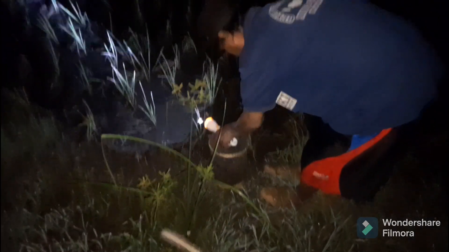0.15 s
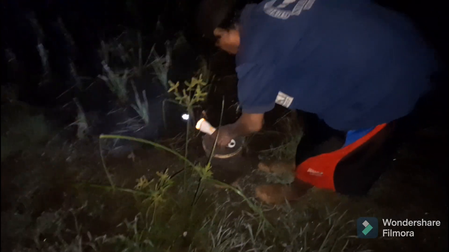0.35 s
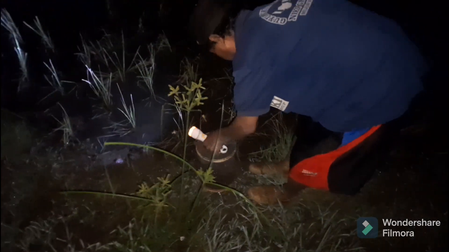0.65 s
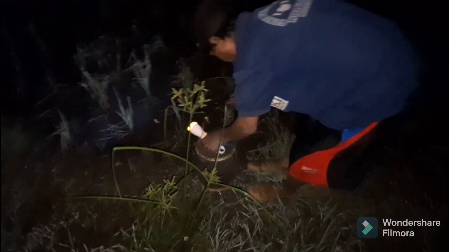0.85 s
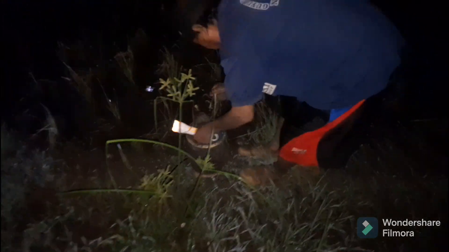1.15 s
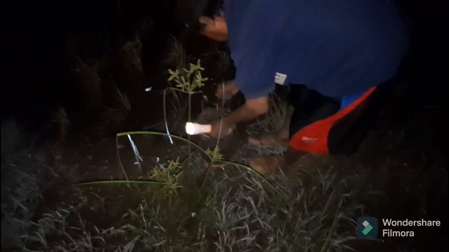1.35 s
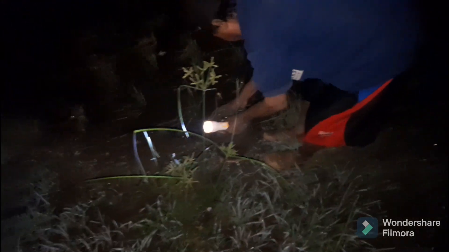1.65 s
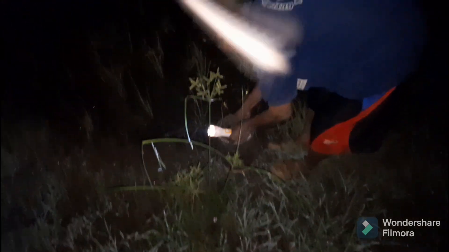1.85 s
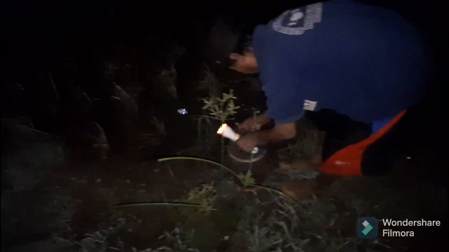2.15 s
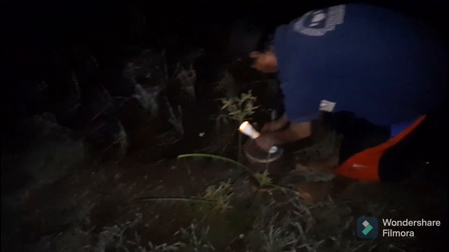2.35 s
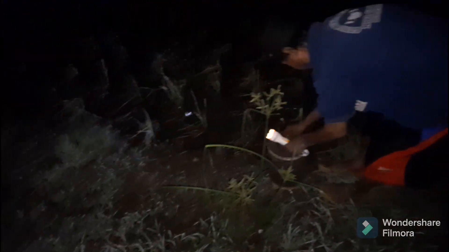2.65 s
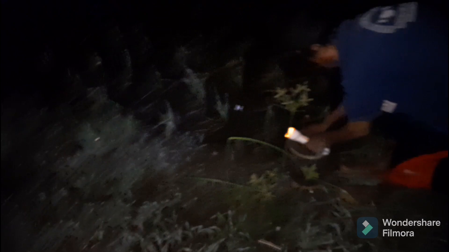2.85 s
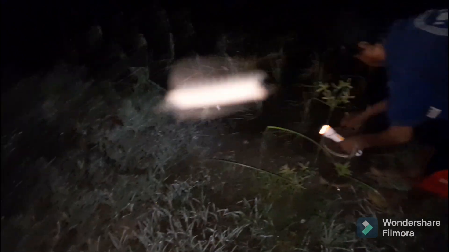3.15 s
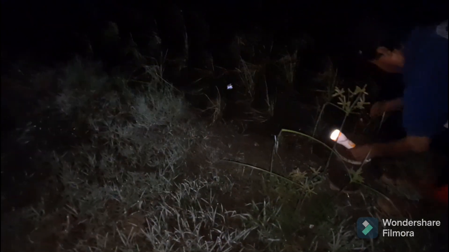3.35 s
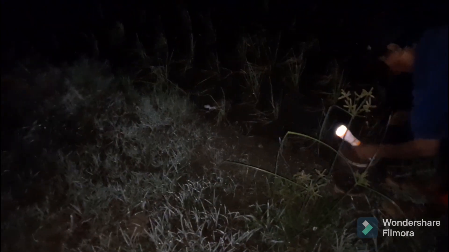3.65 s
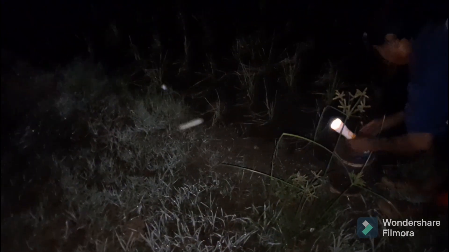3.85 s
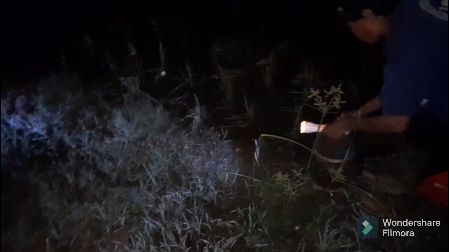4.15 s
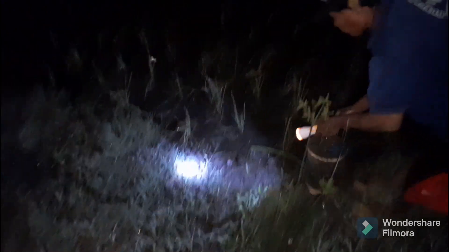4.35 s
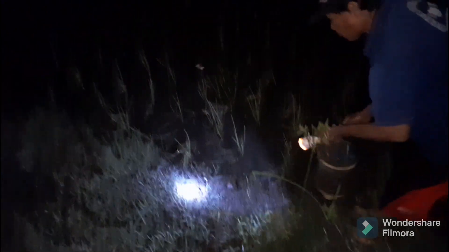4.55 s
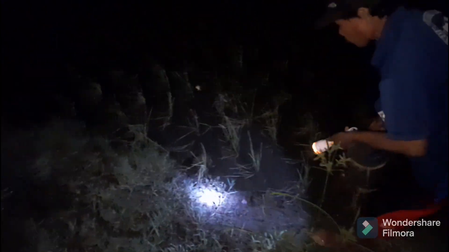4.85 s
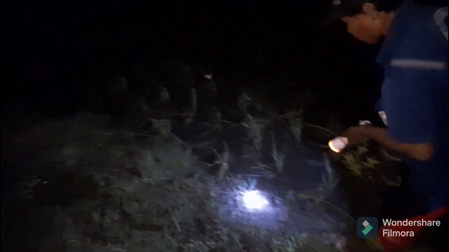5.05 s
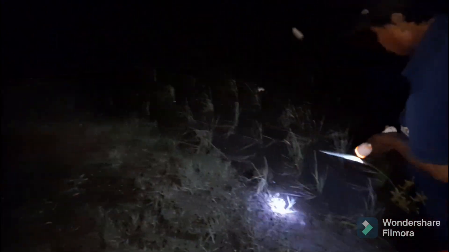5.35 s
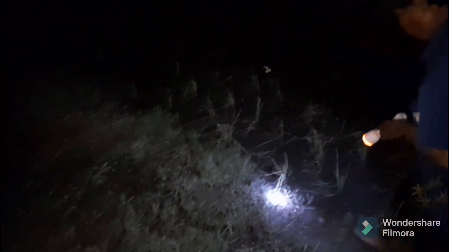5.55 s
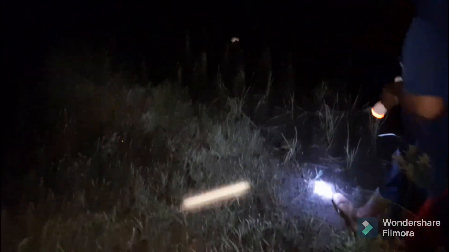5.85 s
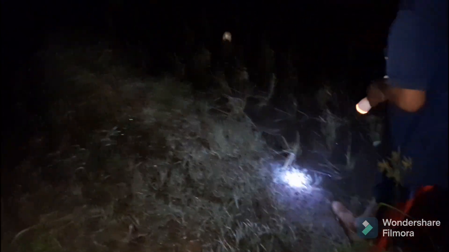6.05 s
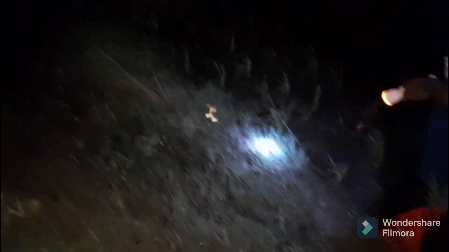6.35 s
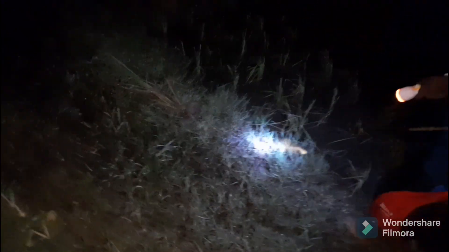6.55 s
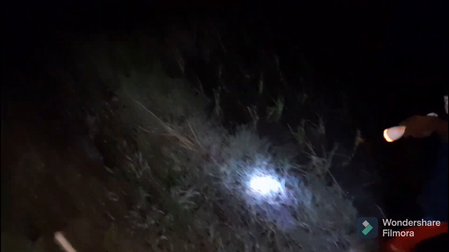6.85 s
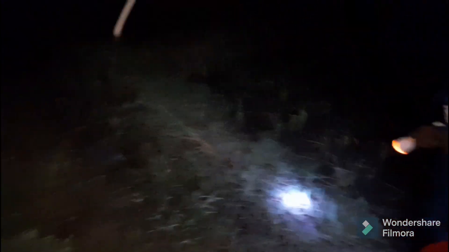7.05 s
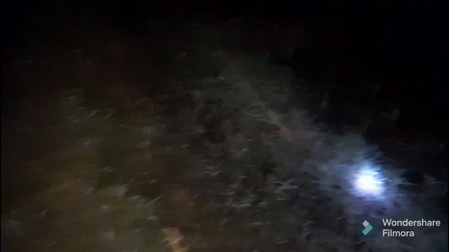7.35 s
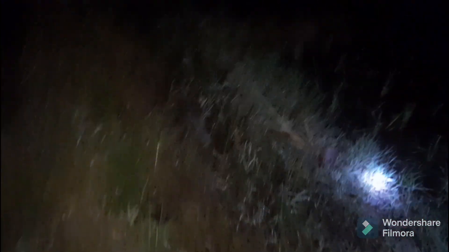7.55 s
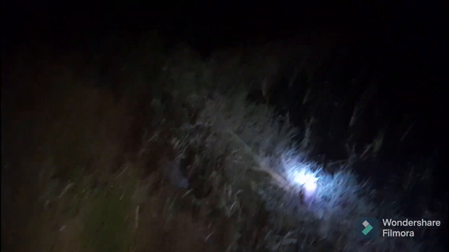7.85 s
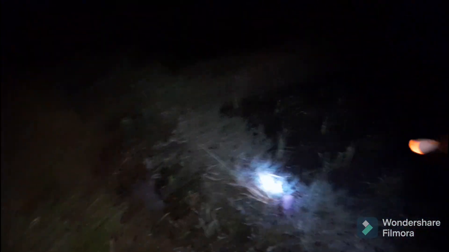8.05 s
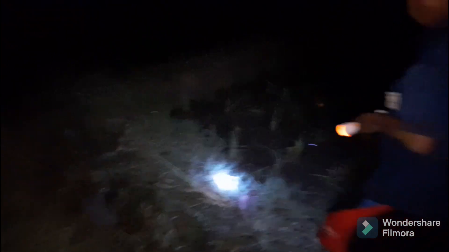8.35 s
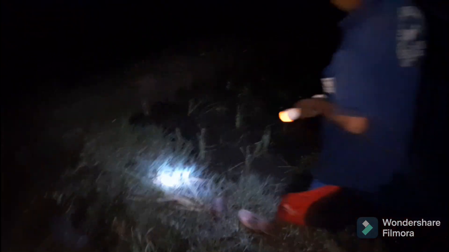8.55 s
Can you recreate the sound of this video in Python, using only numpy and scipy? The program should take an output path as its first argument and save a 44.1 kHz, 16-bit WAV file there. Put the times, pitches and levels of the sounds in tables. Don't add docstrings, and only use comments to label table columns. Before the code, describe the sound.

A summer night on a river bank, hand-held stereo with the view slowly turning. Throughout, deep soft river rumble lies under a close mole cricket's continuous reedy trill, first left, weaker around 4 s, stronger and centred near 6.5 s. Clear cricket chirps come about twice a second until 5.3 s, faintly returning near 7.5 s, amid very high rasping buzzers and quick chirpers; a faint far motor hum fades early. From 0 to 0.6 s grass swishes with dry ticks. Between 0.73 and 1.05 s heavy thuds, gritty crunches and two hollow pot knocks form the loudest moment. Light rustles and snaps follow at 2.3-2.7 s, a tiny mud suck at 3.4 s. Higher chirps sound at 5, 5.5 and 5.9 s. At 6.1-6.7 s the pot is touched and set down ringing; buzzers drop at 6.3 s. Soft bumps at 7.3-7.8 s, a light step at 8.1 s and grass swishing finish.

```python
import sys
import numpy as np
from scipy import signal
from scipy.fft import rfft, irfft, next_fast_len
from scipy.io import wavfile
from scipy.ndimage import uniform_filter1d

SR = 44100
rng = np.random.default_rng(int(sys.argv[2]) if len(sys.argv) > 2 else 0)


def generate_wav(sig):
    pcm = np.round(np.clip(np.atleast_2d(sig).T, -1, 1) * 32767).astype(np.int16)
    wavfile.write(sys.argv[1], SR, pcm)


def linear_from_db(decibels):
    return 10 ** (np.asarray(decibels, float) / 20)


N = 384111
T = np.arange(N) / SR


def level(x):
    return x / np.sqrt(np.mean(x ** 2))


def columns(table):
    s, *rest = np.transpose(table)
    return [np.interp(T, s, c) for c in rest]


def panned(pan_db):
    return linear_from_db(np.array([pan_db + 0 * T, -pan_db + 0 * T]) / 2)


def coloured(x, points):
    hz, db = np.transpose(points)
    size = next_fast_len(N)
    f = np.arange(size // 2 + 1) * SR / size + 1
    gain = linear_from_db(np.interp(np.log(f), np.log(hz), db))
    return level(irfft(rfft(x, size) * gain, size)[..., :N])


def band(x, hz, width_hz, order=2):
    edges = [max(hz - width_hz / 2, 20), min(hz + width_hz / 2, .45 * SR)]
    return level(signal.sosfilt(signal.butter(order, edges, "band", fs=SR, output="sos"), x))


def pair(likeness):
    mid, side = rng.standard_normal((2, N))
    c = np.clip(likeness, 0, 1)
    return np.sqrt(1 + c) * mid + np.sqrt(1 - c) * side * np.array([[1], [-1]])


def walk(rate):
    k = int(SR / rate)
    held = np.repeat(rng.standard_normal(900)[:N // k + 1], k)
    return 0.87 * uniform_filter1d(uniform_filter1d(held, k), k)[:N]


def gate(start, length, edge=0.0027):
    return np.clip(np.minimum(T - start, start + length - T) / edge, 0, 1)


def swell(start, hold, rise, fall):
    return np.exp(np.minimum((T - start) / rise, 0) + np.minimum((start + hold - T) / fall, 0))


def add(out, s, sound, pan_db):
    i = int(s * SR)
    gains = linear_from_db(np.array([[pan_db], [-pan_db]]) / 2)
    out[:, i:i + sound.shape[-1]] += (sound * gains)[:, :N - i]


def strokes(hz, rate, duty, wander_hz, slip, uneven_db, blur, lag=0):
    turn = np.cumsum(rate * (1 + 0.0049 * walk(2.9))) / SR
    chance = rng.standard_normal((1500, 2))
    stroke = turn.astype(int)
    part = np.clip((turn - stroke) / duty, 0, 1)
    phase = 2 * np.pi * np.cumsum(hz + wander_hz * walk(20)) / SR
    tone = np.sin(phase + slip * chance[stroke, 0])
    size = linear_from_db(uneven_db * chance[:, 1])[stroke]
    direct = level(np.sin(np.pi * part) ** 2 * size * tone)
    plants = np.exp(-T[:700] / .004) * rng.standard_normal((2, 700))
    echoes = level(signal.oaconvolve(direct[None], plants, axes=1)[:, :N])
    return level(np.array([np.roll(direct, lag), direct]) + blur * echoes)


# frequency in Hz, power density in dB per Hz
AIR_SPECTRUM = [(300, -3), (450, -4.5), (900, -51), (1400, -10.5), (2200, -4), (3300, 15.5), (3900, -62),
                (5000, -12), (7000, -4), (9500, 2), (11200, -2), (12500, -37), (15000, -6), (16500, -41)]
AIR_DB = -61.5


def night_air():
    return coloured(pair(0.25), AIR_SPECTRUM) * linear_from_db(AIR_DB + 1.5 * walk(2.17))


RIVER_PAN_DB, RIVER_TURN_DB, RIVER_TURN_S = 0.9, -0.3, 5.2
MOTOR_DB, MOTOR_FADE_DB_S = -43, 4


def river_side():
    return panned(RIVER_PAN_DB + RIVER_TURN_DB * np.clip(T - RIVER_TURN_S, 0, 1))


def far_motor():
    tone = np.sin(2 * np.pi * np.cumsum(128 + 1.5 * walk(8)) / SR)
    throb = 1 + 1.1 * np.sin(2 * np.pi * 25.6 * (T - .032))
    return level(tone * throb) * linear_from_db(MOTOR_DB - MOTOR_FADE_DB_S * T ** 2 + 1.3 * walk(7.2)) * river_side()


# time in seconds, level in dB
RUMBLE_LEVEL = [(0.0, -46.5), (.4, -47), (.75, -44), (1.2, -48), (1.5, -49.5), (1.75, -48), (2.4, -47.5),
                (3.2, -49), (3.9, -48.5), (4.8, -51.5), (5.7, -49.5), (6.2, -48), (6.9, -50.5),
                (7.15, -52.5), (7.4, -49), (8.3, -49), (8.55, -52), (8.71, -50)]
# frequency in Hz, power density in dB per Hz
RIVER_SPECTRUM = [(20, -45), (31, -27), (42, -14), (60, -2), (123, 0), (150, -1), (173, -8.5), (193, -12),
                  (285, -22.5), (400, -31), (520, -55), (880, -100)]


def river():
    deep_db = columns(RUMBLE_LEVEL)[0]
    return coloured(pair(0.88), RIVER_SPECTRUM) * linear_from_db(deep_db + 1.45 * walk(8.2)) * river_side()


SHAKE_DB, SHAKE_S = -11.5, 0.05


def shaken_bank():
    shake = sum(linear_from_db(row[1] + SHAKE_DB) * swell(row[0], 0.018, 0.024, SHAKE_S) for row in POT_KNOCKS)
    upper_db = columns(RUMBLE_LEVEL)[0] - 20
    return band(pair(0.66), 258, 313) * (linear_from_db(upper_db + 3.6 * walk(11)) + shake) * river_side()


def chirper(hz, rate, late_s):
    turn = 2 * np.pi * rate * (T - late_s)
    beat = np.clip(.7 + 1.4 * np.sin(turn), .2, 1) * linear_from_db(1.5 * walk(9))
    return beat * strokes(hz + 35 * np.cos(turn), 126, duty=.55, wander_hz=45, slip=2.2,
                          uneven_db=2.5, blur=.55, lag=2)


# time in seconds, level of the upper in dB, level of the lower in dB
CHIRPER_LEVELS = [(0, -80, -85), (1.75, -78, -85), (3.2, -68, -83), (4.4, -67.5, -79), (5.3, -69, -71.5),
                  (6.3, -77, -68.5), (7.2, -72, -69), (7.9, -72.5, -70), (8.2, -80, -80), (8.71, -80, -80)]
# time in seconds, level of the lower in dB, level of the higher in dB
BUZZ_LEVELS = [(0, -77, -72), (1.5, -67, -68), (3, -71.5, -68), (4.6, -68.5, -66), (5.2, -67, -67.5),
               (6.3, -70, -73)]
BUZZ_STOP_S, BUZZ_FADE_S, FAR_BUZZ_DB = 6.32, .03, -79
LOW_PAN_DB, HIGH_PAN_DB, CHIRPER_PAN_DB = 9.5, -0.5, 14
CHORUS_HZ, CHORUS_WIDTH_HZ, CHORUS_DB = 9680, 2800, -72


def bush_crickets():
    low = strokes(9620 + 60 * walk(1.5), 100.8, duty=.38, wander_hz=60, slip=2, uneven_db=2, blur=.4, lag=2)
    overtone = strokes(14600, 100.8, duty=.07, wander_hz=300, slip=3, uneven_db=1.5, blur=.7, lag=2)
    low = low + linear_from_db(-12) * overtone
    high = strokes(10380 + 70 * walk(1.5), 131.2, duty=.4, wander_hz=70, slip=2, uneven_db=2, blur=.4, lag=1)
    far = strokes(11000, 138.8, duty=.4, wander_hz=150, slip=3, uneven_db=1.5, blur=.7, lag=1)
    upper_db, lower_db = columns(CHIRPER_LEVELS)
    upper_chirps = chirper(9420 - 55 * T, 7.69, 2.966) * linear_from_db(upper_db)
    lower_chirps = chirper(8370, 8.24, 5.225) * linear_from_db(lower_db)
    chirps = (upper_chirps + lower_chirps) * panned(CHIRPER_PAN_DB)
    low_db, high_db = columns(BUZZ_LEVELS)
    buzz = low * linear_from_db(low_db + 0.53 * walk(2.4)) * panned(LOW_PAN_DB)
    buzz = buzz + high * linear_from_db(high_db + 0.5 * walk(0.48)) * panned(HIGH_PAN_DB)
    singing = np.clip((BUZZ_STOP_S - T) / BUZZ_FADE_S, .25, 1)
    chorus = band(pair(0.12), CHORUS_HZ, CHORUS_WIDTH_HZ, order=3)
    chorus = chorus * linear_from_db(CHORUS_DB + 2.6 * walk(3.87)) * panned(7.3)
    return chorus + buzz * singing + chirps + far * linear_from_db(FAR_BUZZ_DB)


# time in seconds, level in dB
FIELD_LEVEL = [(0, -86), (3.0, -84), (3.4, -79.5), (4.1, -80.5), (4.45, -84), (4.8, -83), (5.5, -84),
               (6.9, -85), (8.71, -88)]


def field_cricket():
    stroke = (T - 3.296) % .2885 * 23.5
    part = stroke % 1
    falling = np.sin(2 * np.pi * (5170 * part - 320 * part ** 2) / 23.5)
    size = linear_from_db(columns(FIELD_LEVEL)[0] + 5 + 2 * walk(20) + 4 * walk(90)) * np.clip(5 - stroke // 1, .05, 1)
    return size * np.sin(np.pi * np.clip(part / 0.96, 0, 1)) * falling


# time in seconds, level in dB
CLEAR_LEVEL = [(0, -73), (1.7, -72), (2.9, -69), (4.5, -67.5), (5.2, -70.5), (5.5, -84), (6.9, -83),
               (7.3, -74), (7.87, -73), (7.92, -80), (8.71, -80)]
CLEAR_HZ, CLEAR_STROKES, CLEAR_S, CLEAR_PAN_DB = 6740, 85, 0.222, 2
CLEAR_PERIOD_S, CLEAR_PAUSE_AT_S, CLEAR_PAUSE_S = .5535, 2.5, .037


def clear_cricket():
    since = (T - CLEAR_PAUSE_S * (T > CLEAR_PAUSE_AT_S)) % CLEAR_PERIOD_S
    chirping = np.clip(np.minimum(since, CLEAR_S - since) / 0.0024, 0, 1)
    clear = strokes(CLEAR_HZ, CLEAR_STROKES, duty=.85, wander_hz=25, slip=.6, uneven_db=1.2, blur=.15, lag=2)
    return clear * chirping * linear_from_db(columns(CLEAR_LEVEL)[0]) * panned(CLEAR_PAN_DB)


# start in seconds, length in seconds, level in dB
HIGH_CHIRPS = [
    (4.975, .22, -64),
    (5.495, 0.18, -65.5),
    (5.87, 0.09, -75),
]


def higher_cricket():
    hz = 7640 + 1300 * np.clip(T - 5.5, 0, .17) - 110 * (T > 5.4) + 60
    higher = strokes(hz, 140, duty=.62, wander_hz=60, slip=2, uneven_db=2, blur=.45, lag=2)
    return higher * sum(linear_from_db(db) * gate(s, length) for s, length, db in HIGH_CHIRPS) * panned(8.3)


# time in seconds, level in dB, left minus right in dB
DRONE_LEVEL = [(0.0, -56, 7), (0.7, -54.5, 6), (1.33, -52, 4.5), (2.64, -56, 7.5), (2.93, -58.5, 14),
               (3.35, -58.5, 7.5), (3.95, -63, 14), (4.68, -58.5, 12), (5.4, -61, 10), (5.7, -59.5, 4),
               (6.5, -53.5, 2), (7.37, -59.5, -1), (7.74, -59, 0.5), (8.37, -56.5, 1), (8.71, -58.5, 9)]


def mole_cricket():
    db, pan_db = columns(DRONE_LEVEL)
    trill = strokes(3075, 154.2, duty=.88, wander_hz=24, slip=.9, uneven_db=1.4, blur=.3, lag=4)
    return band(trill, 2990, 980, order=4) * linear_from_db(db + 1.0 * walk(14)) * panned(pan_db)


# start in seconds, hold in seconds, level in dB, extra weight in dB
GRASS_SWISHES = [(0.034, 0.029, -62.5, 4.5), (0.113, 0.063, -60, -1.5), (0.196, 0.075, -58.5, -3.5),
                 (0.323, 0.062, -68, 5), (0.436, 0.029, -57.5, -5), (.53, 0.071, -87, 17.5),
                 (0.746, 0.042, -60, 4), (.86, 0.018, -80, -11), (0.979, 0.011, -53, 3),
                 (1.147, 0.076, -64.5, 1), (1.29, 0.046, -73, 4.5), (1.772, 0.035, -85, 1),
                 (1.954, 0.23, -83, 8.5), (2.307, 0.099, -63.5, 5.5), (2.57, 0.2, -77, 11),
                 (2.75, 0.25, -70.5, -3.5), (3.29, 0.019, -68, -1), (4.11, 0.2, -87.5, 10.5),
                 (4.43, 0.24, -83, 6.5), (4.688, 0.14, -79.5, 7), (4.99, 0.25, -67, 1.5),
                 (5.798, 0.18, -70, 2), (6.14, 0.075, -68, 6), (6.433, 0.21, -72.5, 3),
                 (6.746, 0.085, -73.5, 9), (7.196, 0.22, -65, -1), (7.5, 0.43, -76, -27),
                 (8.286, 0.37, -61, -2)]
# time in seconds, level in dB
STIR_LEVEL = [(0, -72.5), (1.3, -72.5), (3, -73), (4.3, -83), (5.5, -77.5), (8.71, -75)]
SWISH_RISE_S, SWISH_FALL_S = 0.043, 0.046


def brushing():
    stir = linear_from_db(columns(STIR_LEVEL)[0])
    light, heavy = stir, linear_from_db(6.5) * stir
    for s, hold, db, weight_db in GRASS_SWISHES:
        shape = swell(s, hold, SWISH_RISE_S, SWISH_FALL_S)
        light = light + linear_from_db(db) * shape
        heavy = heavy + linear_from_db(db + weight_db) * shape
    clicks = (rng.random(N) < 900 / SR) * linear_from_db(4.6 * rng.exponential(size=N)) * rng.standard_normal(N)
    smear = np.exp(-np.arange(200) / SR / 0.004) * rng.standard_normal((2, 200))
    crackle = level(signal.oaconvolve(clicks[None], smear, axes=1)[:, :N])
    scrape = (0.07 * crackle + level(pair(0.0092))) * linear_from_db(1.7 * walk(35) + 1.7 * walk(70))
    top = band(scrape, 13600, 3500) * light * linear_from_db(-3.5)
    middle = band(scrape, 7020, 5230, order=3) * (light + 0.28 * heavy) * linear_from_db(-0.5 + 0.5 * walk(36))
    low = band(scrape + 0.48 * pair(0.18), 2380, 2400, order=4) * heavy * linear_from_db(-2.0 + 3.9 * walk(22))
    crumbling = heavy * np.clip(heavy / light / 1.85, 0.2, 2)
    soil = band(0.5 * crackle + pair(0.16), 493, 530) * crumbling * linear_from_db(-5 + 6.2 * walk(30))
    return top + middle + low + soil


def packets(rows, pan_db, rough):
    out, t = np.zeros((2, N)), T[:4000] - T[2000]
    for s, db, hz, cycles in rows:
        shape = np.exp(-(2 * t * hz / cycles) ** 2)
        phase = 2 * np.pi * hz * t + 6 * rng.random()
        jitter = rough * level(uniform_filter1d(rng.standard_normal(4000), size=150))
        add(out, s - T[2000], linear_from_db(db) * shape * np.cos(phase + jitter), pan_db)
    return out


# time in seconds, peak in dB, pitch in Hz, cycles
HAND_BUMPS = [(.889, -31, 125, 1.7), (1.66, -36.5, 91, 1.8), (1.98, -35, 90, 1.9), (3.97, -46, 80, 2.2),
              (7.27, -38.5, 110, 1.5), (7.32, -41, 120, 1.3), (7.445, -42, 127, 1.5),
              (7.598, -40.5, 110, 1.4), (7.655, -40.5, 130, 1.8), (7.722, -35, 110, 1.6),
              (7.85, -41, 140, 2), (8.3, -39.5, 120, 2.6), (8.36, -44, 140, 2.3)]


def hand_bumps():
    return packets(HAND_BUMPS, pan_db=.4, rough=.02)


# time in seconds, peak in dB, pitch in Hz, cycles
SOIL_LUMPS = [(.05, -52, 800, 14), (.056, -49, 510, 7), (.078, -53, 746, 10), (.21, -56, 780, 11),
              (.46, -56, 1050, 8), (.59, -56, 950, 6), (.845, -40, 650, 4.5), (.958, -42, 650, 6),
              (.965, -47, 1000, 6), (3.391, -60, 760, 12), (3.422, -55, 447, 8), (5.854, -50, 750, 3),
              (5.9, -50.5, 330, 6), (5.924, -62, 1320, 14), (6.045, -60, 700, 10), (6.123, -50, 1020, 10),
              (6.135, -46, 570, 8.7), (6.17, -52, 450, 8), (6.21, -52.5, 2200, 25), (6.238, -46, 474, 8),
              (7.24, -60.5, 380, 8), (7.29, -53, 280, 3.5), (7.335, -54, 310, 10), (7.41, -54, 300, 8),
              (8.092, -54, 600, 4.4), (8.125, -55, 400, 7.3), (8.268, -54.5, 546, 15),
              (8.292, -57, 1850, 30), (8.375, -56, 2150, 35)]


def soil_lumps():
    return packets(SOIL_LUMPS, pan_db=2.2, rough=.9)


# time in seconds, peak in dB, pitch in Hz, cycles
CRACKING_GRAINS = [(.787, -52, 2280, 6.9), (.819, -37, 1900, 6), (.824, -35, 1430, 6), (.83, -34, 210, 2.4),
                   (.838, -47, 2030, 9), (.862, -45, 690, 4), (.9375, -39.5, 1700, 5.6),
                   (.944, -48, 2190, 7.4), (.972, -52, 1300, 4.4), (.988, -42, 890, 5),
                   (1.006, -46, 2110, 9), (1.012, -46, 1390, 8), (1.016, -39.5, 546, 5.1),
                   (1.077, -48, 590, 4), (2.318, -51, 500, 4), (2.334, -58, 1500, 5.9),
                   (2.357, -46, 720, 7.2), (2.428, -56, 1500, 6), (2.447, -51, 493, 4),
                   (2.458, -49, 746, 5), (2.462, -47, 1390, 8), (2.566, -59, 567, 4), (2.612, -50, 810, 5),
                   (2.623, -54, 1450, 8), (2.64, -52, 700, 5), (2.68, -50, 1440, 8), (2.699, -54, 1450, 8),
                   (3.477, -58, 1000, 6), (6.585, -50, 554, 9), (6.71, -47.5, 543, 22),
                   (7.178, -57, 1850, 18), (7.325, -61, 1000, 4.6), (7.725, -66, 1140, 10)]


def cracking_grains():
    return packets(CRACKING_GRAINS, pan_db=1.5, rough=.5)


SQUELCH_S, SQUELCH_LENGTH_S, SQUELCH_HZ, SQUELCH_GLIDE, SQUELCH_DB = 3.397, 0.025, 360, .27, (-53, -50, -56.5)


def squelch():
    out = np.zeros((2, N))
    part = np.clip(T[:4000] / SQUELCH_LENGTH_S, 0, 1)
    turn = 2 * np.pi * np.cumsum(SQUELCH_HZ * (1 + SQUELCH_GLIDE * part)) / SR
    uneven = linear_from_db(3.2 * level(uniform_filter1d(rng.standard_normal(4000), size=90)))
    shape = np.sin(np.pi * part ** 1.1) ** 2 * uneven
    partials = sum(linear_from_db(db) * np.sin((k + 1) * turn) for k, db in enumerate(SQUELCH_DB))
    add(out, SQUELCH_S, shape * partials, 14)
    return out


def ring(hz, t60, attack=0.0003):
    t = T[:5000]
    return np.sin(2 * np.pi * hz * t) * np.exp(-np.log(1000) * t / t60) * np.clip(t / attack, 0, 1)


# time in seconds, peak in dB, pitch in Hz
STALK_TICKS = [(0.0273, -47, 2290), (0.1196, -40, 2290), (0.1565, -41, 2210), (0.2783, -45, 2070),
               (0.5861, -50, 2500), (0.8165, -28, 2100), (0.9, -44, 2130), (0.9712, -38, 2150),
               (1.075, -42, 2340), (1.4152, -44, 2130), (1.6176, -45, 2120), (2.2827, -50, 2320),
               (2.3111, -43, 2450), (2.9153, -46, 2270), (4.1295, -40.5, 2010), (5.5984, -47, 2570),
               (5.765, -44, 2310), (6.1165, -41, 2400), (6.1828, -40.5, 2200), (6.4742, -46, 2220),
               (6.498, -44, 2280), (6.5767, -35, 2070), (7.1467, -50, 2330), (7.2355, -43, 2300),
               (7.3178, -44, 2150), (7.637, -48, 2240), (7.7294, -55, 2250), (7.894, -47, 2220),
               (8.0366, -49, 2290), (8.614, -41, 2290)]


def stalk_ticks():
    out, t = np.zeros((2, N)), T[:5000]
    for s, db, hz in STALK_TICKS:
        click = rng.standard_normal(5000) * np.exp(-t / 0.002)
        tick = ring(hz, .016) + .5 * ring(hz * 0.904, 0.0087) + .5 * click
        add(out, s, linear_from_db(db - 8.5) * tick, 0.5)
    return out


# time in seconds, peak in dB, pitch in Hz
STEM_SNAPS = [(0.19, -39.5, 6400), (0.403, -43.5, 3780), (0.56, -46.5, 6450), (0.815, -36.5, 4250),
              (0.933, -41.5, 4120), (1.2205, -55, 6010), (1.2669, -52, 6250), (3.799, -62, 6000),
              (1.7962, -53, 5930), (1.943, -54, 3930), (2.0147, -51, 6290), (2.136, -50, 7700),
              (2.2726, -50, 7240), (2.355, -48, 3830), (2.456, -50, 4170), (2.5505, -53, 4660),
              (2.839, -47, 4240), (3.153, -51, 7590), (3.2838, -47, 7460), (3.436, -46, 7080),
              (4.125, -52, 5250), (5.013, -44.5, 6550), (5.038, -51, 6010), (5.101, -47, 6500),
              (5.853, -49, 7560), (6.115, -51, 6670), (6.8437, -55, 6570), (7.3266, -51, 6290),
              (8.0261, -53, 6700), (8.036, -52, 5500), (8.313, -52, 7810)]


def stem_snaps():
    out, t = np.zeros((2, N)), T[:5000]
    fading = np.exp(-t / 0.0037) + 0.2 * np.exp(-t / 0.029)
    for s, db, hz in STEM_SNAPS:
        noise = rng.standard_normal((3, 5000))
        crack = band(noise[:2] + 0.99 * noise[2], hz, 1400, order=1) * fading
        add(out, s, linear_from_db(db - 0.5) * crack * np.clip(t / 0.0034, 0, 1) ** 2, -1.2)
    return out


def knock(low_hz, high_hz, high_db, cycles, crunch_db, rattle_s):
    t, noise = T[:5000], rng.standard_normal((5, 5000))
    contacts = noise[3] * np.abs(noise[3]) * np.exp(-t / rattle_s) * np.clip(2 * t / rattle_s, 0, 1)
    modes = np.array([ring(low_hz, cycles / low_hz), ring(low_hz * (1.37 + 0.1 * noise[4, 0]), 0.021),
                      ring(high_hz, 1.72 * cycles / high_hz), ring(high_hz * 1.4, 0.026)])
    rings = signal.fftconvolve(contacts[None], modes, axes=1)[:, :5000]
    sizes = linear_from_db(np.array([0, -11, high_db - 3.5, high_db - 15.0])) / np.abs(rings).max(axis=1)
    rings = sizes @ rings * linear_from_db(2.96 * level(uniform_filter1d(noise[4], 250)))
    grain = linear_from_db(0.67 * level(uniform_filter1d(noise[4], 60)))
    body = (np.exp(-t / 0.0084) + 0.27 * np.exp(-t / 0.033)) * np.clip(t / rattle_s, 0, 1)
    crunch = band(noise[:2] + noise[2], 740, 1390, order=2) * grain * body
    return rings + crunch * linear_from_db(high_db / 2 + crunch_db)


def knocks(rows, cycles, crunch_db, rattle_s, pan_db):
    out = np.zeros((2, N))
    for s, db, low_hz, high_hz, high_db in rows:
        add(out, s, linear_from_db(db) * knock(low_hz, high_hz, high_db, cycles, crunch_db, rattle_s), pan_db)
    return out


# time in seconds, peak in dB, low ring in Hz, dry stalk ring relative in dB
FOOT_CRUNCHES = [(0.479, -57.5, 310, 13), (0.782, -47, 735, 5), (0.815, -34, 368, 2.5),
                 (0.985, -40.5, 790, -4), (0.995, -48, 676, -3.5), (1.003, -38.5, 825, -16),
                 (1.067, -50, 296, -6), (1.219, -58, 514, 4.5), (1.264, -64, 370, 8), (2.303, -54, 333, -3),
                 (2.349, -41, 725, -5), (2.453, -46.5, 730, 2), (3.142, -56, 810, 3.5),
                 (3.429, -58.5, 343, 9.5), (4.1, -60, 300, 11.5), (4.128, -54, 650, 3),
                 (4.646, -51.5, 537, -9), (4.726, -57, 543, 1), (4.749, -59, 567, 8),
                 (5.311, -53, 604, 0.5), (5.852, -53, 338, 1), (6.239, -47, 400, -37)]
# time in seconds, peak in dB, low ring in Hz, high ring in Hz, high ring relative in dB
POT_KNOCKS = [
    (0.822, -36, 439, 1490, -2),
    (0.933, -35.5, 442, 996, -4),
    (6.117, -43, 556, 1013, -7),
    (6.201, -49, 473, 1580, -10),
    (6.571, -50, 565, 992, 14),
    (6.574, -62, 540, 1350, 17.5),
    (6.685, -48, 546, 1242, 2.5),
]
SOIL_CLODS = [(0.047, -55, 524, 805, 3), (6.103, -55, 322, 595, 7), (6.224, -44, 460, 830, -10),
              (0.73, -45.5, 486, 990, -26), (0.85, -35.5, 430, 890, -33), (0.954, -47, 458, 1050, -15),
              (1.011, -36, 300, 940, -33), (2.545, -63, 730, 1430, 10), (2.596, -50, 583, 1470, 5),
              (2.615, -45.5, 560, 1520, -1.5), (2.676, -64, 607, 1440, 8), (3.473, -49, 590, 1040, -6),
              (4.259, -56.5, 298, 1270, 4), (5.92, -54, 422, 1360, -11), (8.077, -47, 426, 1920, 3.5),
              (8.1, -51, 440, 700, -27), (8.245, -53.5, 360, 1750, 2)]
MUD_PLOPS = [
    (3.43, -65, 600, 2120, 5),
]
STALK_HZ, STALK_SPREAD = 2220, 0.069


def pot_and_ground():
    stalk_hz = STALK_HZ * (1 + STALK_SPREAD * rng.standard_normal(30))
    crunches = [(s, db, hz, stalk_hz[k], high_db) for k, (s, db, hz, high_db) in enumerate(FOOT_CRUNCHES)]
    pot = knocks(POT_KNOCKS, cycles=85, crunch_db=-5, rattle_s=.0025, pan_db=1.2)
    ground = knocks(crunches, cycles=20, crunch_db=-3, rattle_s=.0055, pan_db=2.5)
    clods = knocks(SOIL_CLODS, cycles=26, crunch_db=-4, rattle_s=.006, pan_db=4)
    plops = knocks(MUD_PLOPS, cycles=35, crunch_db=-22, rattle_s=.005, pan_db=20)
    return pot + ground + clods + plops


# time in seconds, peak in dB, pitch in Hz
FOOT_THUDS = [
    (0.735, -29, 106),
    (0.82, -24.5, 96),
    (0.874, -22.5, 116.4),
    (0.948, -27, 82.5),
    (1.03, -37, 61.4),
    (8.087, -35, 85),
]


def footfalls():
    out = np.zeros((2, N))
    for s, db, hz in FOOT_THUDS:
        add(out, s, linear_from_db(db) * ring(hz, 0.25, attack=0.015) * np.hanning(10000)[5000:], 1.5)
    return out


def scene():
    insects = mole_cricket() + bush_crickets() + clear_cricket() + higher_cricket() + field_cricket()
    grass = brushing()
    background = river() + far_motor() + shaken_bank() + night_air()
    blows = pot_and_ground() + stem_snaps() + footfalls() + stalk_ticks()
    small_sounds = cracking_grains() + hand_bumps() + soil_lumps() + squelch()
    return insects + grass + background + blows + small_sounds


def top_cut(x):
    return signal.sosfilt(signal.butter(12, 15800, fs=SR, output="sos"), x)


def record(dry):
    cavity = signal.lfilter(*signal.iirpeak(2200, 3.5, fs=SR), dry[1])
    x = np.array([dry[0], dry[1] + 2.82 * cavity])
    x = signal.sosfilt(signal.ellip(10, .3, 70, 15760, fs=SR, output="sos"), x)
    x = signal.sosfilt(signal.butter(2, 38, "high", fs=SR, output="sos"), x)
    return top_cut(x)


dry = scene()
out = record(dry)
generate_wav(out)
```